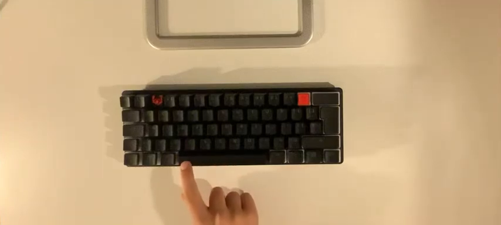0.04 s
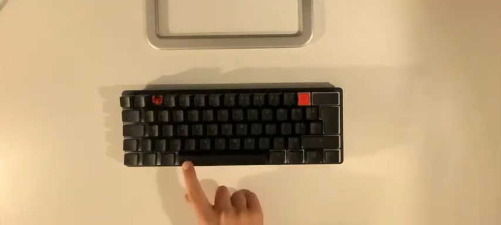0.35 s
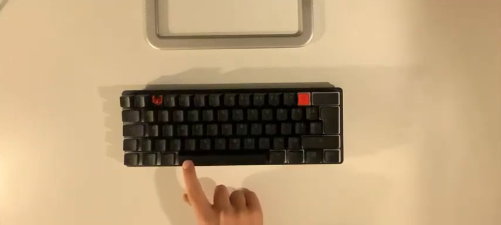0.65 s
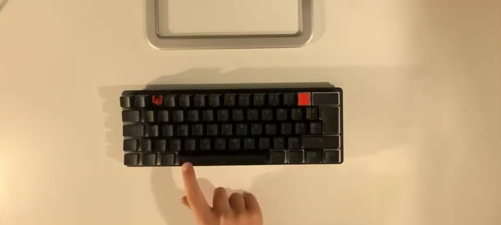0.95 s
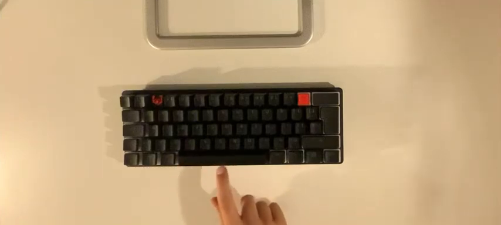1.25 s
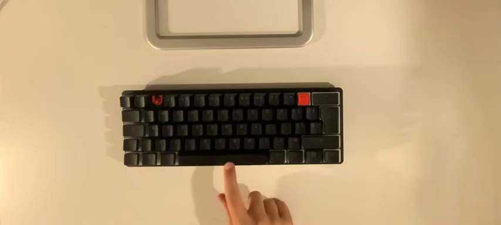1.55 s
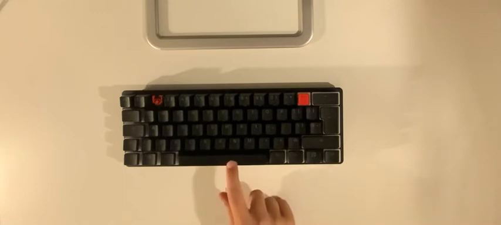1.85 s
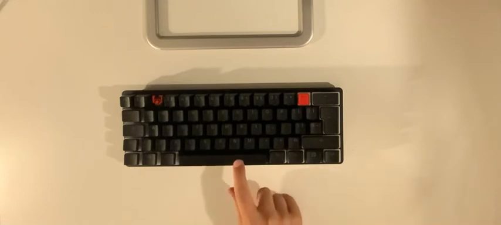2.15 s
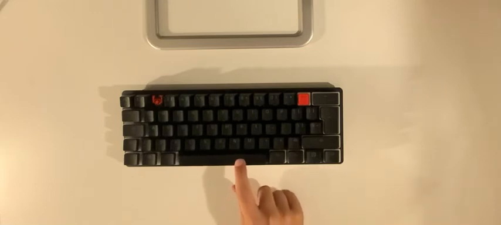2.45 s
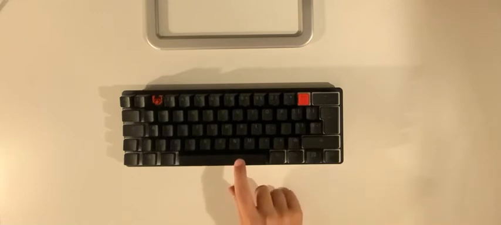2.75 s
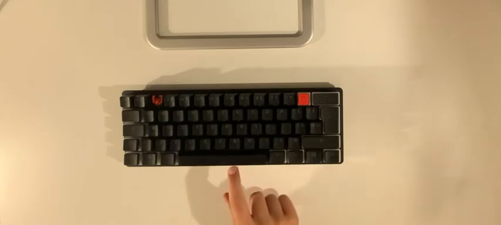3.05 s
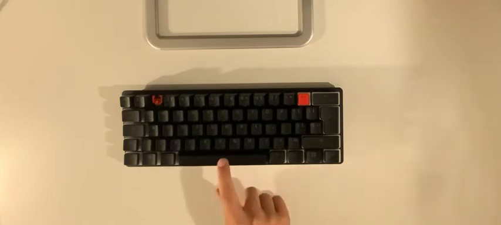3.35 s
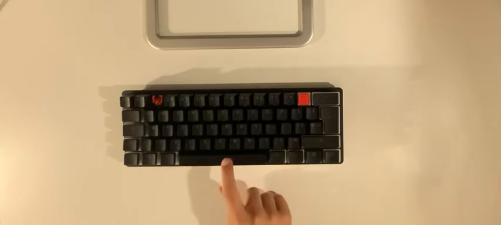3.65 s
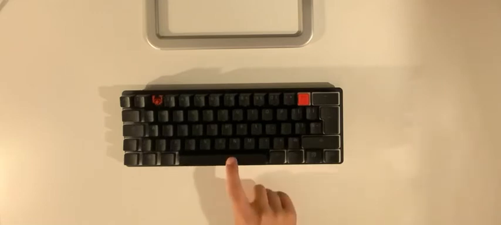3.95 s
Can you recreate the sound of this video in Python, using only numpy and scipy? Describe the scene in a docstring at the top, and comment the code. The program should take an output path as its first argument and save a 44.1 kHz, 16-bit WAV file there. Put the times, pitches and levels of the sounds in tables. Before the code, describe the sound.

Close up in a small room, one finger taps a mechanical keyboard's space bar rapidly, pauses briefly, and carries on, each press thocking and clicking. It ends with three loud, spaced slaps that rattle the loose bar.

```python
"""One finger works the space bar of a mechanical keyboard on a desk in a small room.
Quick, light runs come first. Each landing and return of the bar knocks the desk, whose dispersive
bending waves arrive treble first and end in a low thock. The stabiliser wire ticks, the stem rubs
in its switch, and the loose bar rattles when slapped. At 1.4 s a dull pop sounds on the left.
From 3.2 s three hard strikes close the scene, each dying away in the room."""
import sys
import numpy as np
from scipy import signal
from scipy.fft import rfft, irfft
from scipy.io import wavfile

SR = 44100
rng = np.random.default_rng(int(sys.argv[2]) if len(sys.argv) > 2 else 0)


def unload_wav(signal):
    """Save mono or channel-first audio to the path in sys.argv[1] as 16-bit WAV at rate SR, clipped to [-1, 1]."""
    wavfile.write(
        sys.argv[1],
        SR,
        np.round(np.clip(np.atleast_2d(signal).T, -1, 1) * 32767).astype(np.int16),
    )


N = 176400
SIZE, LEAD = 32768, 2048  # samples in one response, and ahead of its impact
HZ = np.maximum(np.arange(SIZE // 2 + 1) * SR / SIZE, 1)
AGE_S, TIME_S = np.arange(SIZE) / SR, np.arange(N) / SR

# Levels in all tables are relative; balance_db is left minus right.
# The bar springs back to its top stop: start_s, level_db, hardness_db
BAR_RETURNS = [(.001, -34.5, -1.5), (0.147, -29, -20), (.162, -34.5, -15.5), (.297, -33.5, -13.5),
               (0.313, -30.5, -32), (0.436, -25.5, -11.5), (0.458, -31, -17), (0.478, -27.5, -21),
               (0.564, -40.5, -25), (0.719, -36, -12.5), (0.736, -31.5, -24.5), (.881, -35, -15.5),
               (0.907, -39, -11.5), (1.345, -26, -15.5), (1.482, -39, -42), (1.511, -29.5, -10.5),
               (1.6562, -23.5, -2.5), (1.798, -36, -24), (1.821, -23.5, -15.5), (1.971, -35.5, -12),
               (1.994, -26, -14), (2.166, -29, -11.5), (2.335, -34, -13), (2.378, -41.5, -9),
               (2.48, -42, -16), (2.514, -36, -6.5), (2.655, -36.5, -4), (2.777, -28.5, -8.5),
               (2.913, -36.5, -29), (2.942, -35.5, -7), (3.320, -29, 0), (3.668, -28.5, -1),
               (3.991, -39.5, 24)]


def bar_knocks():
    """Impact excitation: the bar drives the desk as it lands and again as it springs back."""
    # Landings of the bar: start_s, level_db, hardness_db, hollow_db, pitch_hz
    landings = [(0.036, -29.5, -56, 16, 245), (0.057, -34, 0.5, 12, 228), (0.188, -26.5, -19.5, 11, 243.3),
                (0.207, -32.5, 1.5, 14, 237), (.338, -28, -20.5, 9, 258), (0.361, -37, -2, 18, 230),
                (.494, -25, -3, 10, 244), (0.767, -33, -17, 20, 243.5), (.781, -31, -0.5, 16, 249),
                (1.2698, -15.5, -6, 2.5, 237.6), (1.412, -24, -1.5, 2, 224), (1.576, -28.5, -6.5, 1.5, 217),
                (1.738, -30.5, 3, 8, 228), (1.896, -28.5, -2, -2, 241), (1.911, -23, -5.5, -1.5, 236),
                (2.052, -35, 0, -7, 252), (2.088, -29, 0, -1.5, 228), (2.248, -30, -6.5, 5, 238),
                (2.408, -22.5, -5.5, 5, 241), (2.564, -26, 0.5, 4.5, 232), (2.708, -27, -4, 1.5, 225.5),
                (2.823, -36, 10.5, 2.5, 242), (2.842, -26.5, -6.5, 7.5, 231), (3.2307, -29, 18.5, -5, 240),
                (3.234, -10.5, -1, -2, 235.2), (3.5612, -9, -1, 1.5, 242.8), (3.9098, -10.5, 3, 0.5, 243)]
    out = np.zeros((2, N))
    for start_s, level_db, hardness_db, hollow_db, pitch_hz in landings:
        thock = impact(desk_response(pitch_hz), level_db + 3, hardness_db, hollow_db, hard_hz=600)
        add(out, start_s - LEAD / SR, thock)
    desk = desk_response(pitch_hz=238)
    for start_s, level_db, hardness_db in BAR_RETURNS:
        thock = impact(desk, level_db + 2.5, hardness_db, hollow_db=6, hard_hz=435)
        add(out, start_s - LEAD / SR, thock)
    return out


def desk_response(pitch_hz):
    """Dispersion: a bending wave travels faster in the treble, echoes off the edge and rings modes."""
    # Spectrum of the bending wave at reference_hz: frequency_hz, level_db
    wave_spectrum = [(20, -70), (60, -38), (95, -33), (140, -20), (205, -0.5), (245, -2.5), (315, -2),
                     (385, -23.5), (490, -23), (650, -24), (1000, -22.5), (1550, -24), (1850, -36.5),
                     (3500, -49.5), (7000, -63.5), (14000, -100)]
    # Direction of the desk's sound: frequency_hz, balance_db
    balance = [(100, -6), (220, -7), (330, -11), (600, -9), (1100, 0), (2500, -20.5)]
    # Normal modes of desk and case: pitch_hz, level_db, t60_s
    modes = [(125, -25.5, 0.5), (236, -10, .16), (311.3, -19.5, 0.12), (390.1, -11.5, 0.14),
             (490, -22.5, 0.1), (781, -21.5, 0.06), (1577, -20, 0.026)]
    reference_hz, stiff_hz = 240.64, 1993  # travel time goes as 1 / sqrt(frequency) up to stiff_hz
    echo_s, echo_db, echo_cut_hz = 0.008327, [5.5, -39], 390  # echo_db: left, right
    delay_s = 0.014 * np.maximum(np.sqrt(reference_hz / HZ) - np.sqrt(reference_hz / stiff_hz), 0)
    travel = np.exp(-2j * np.pi * (np.cumsum(delay_s) * SR / SIZE + HZ * LEAD / SR))
    echo = from_db(echo_db)[:, None] * np.exp(-2j * np.pi * HZ * echo_s) * lowpass(echo_cut_hz)
    ringing = sum(from_db(level_db) / (1 + 1j * (HZ / hz - hz / HZ) * np.pi * hz * t60_s / np.log(1000))
                  for hz, level_db, t60_s in modes)
    wave = minimum_phase(at_hz(wave_spectrum, HZ * reference_hz / pitch_hz))
    response = travel * panned(at_hz(balance, HZ)) * (wave * (1 + echo) + ringing)
    return response / np.abs(irfft(response)).max()


def impact(desk, level_db, hardness_db, hollow_db, hard_hz):
    """Source and filter: the contact force drives the desk, and a harder contact has more treble."""
    cavity_hz, boom_hz, ripple_db = 480, 120.5, 4
    treble = 0.5 + 0.5 * np.tanh(2 * np.log(HZ / hard_hz))
    cavity = np.exp(-(np.log2(HZ / cavity_hz) / 0.66) ** 2)  # the hollow under the bar
    # Hollow strokes also stir the desk's lowest mode.
    boom_db = (1.3 * hollow_db - 8.5) * np.exp(-(np.log2(HZ / boom_hz) / 0.3) ** 2)
    force = from_db(level_db + hardness_db * treble + hollow_db * cavity + boom_db)
    # Where the finger lands changes which desk waves are stirred.
    knots_hz = np.geomspace(200, 3000, 16)
    ripple = np.interp(HZ, knots_hz, rng.standard_normal(len(knots_hz)) * (knots_hz > 230))
    cushion = lowpass(4500)  # the keyboard's feet keep the top out of the desk
    return irfft(desk * chatter() * cushion * minimum_phase(ripple_db * ripple) * force)


def chatter(touches=12, spread_s=0.0105, crossover_hz=493):
    """Interference: one contact is a single push in the bass and scattered small touches higher up."""
    touch_s = rng.uniform(-0.3918, 0.5095, touches) * spread_s
    scatter = rng.standard_normal(touches) @ np.exp(-2j * np.pi * touch_s[:, None] * HZ)
    scatter /= np.sqrt(np.mean(np.abs(scatter[(HZ > 600) & (HZ < 1800)]) ** 2))
    share = 1 / (1 + (crossover_hz / HZ) ** 4) ** 2
    return np.sqrt(1 - share) + np.sqrt(share) * scatter


def case_knocks(swell_s=0.0043):
    """Damped resonance: a firm landing makes the hollow plastic case sound for a few cycles."""
    # Knocks of the case: start_s, level_db, pitch_hz
    knocks = [(0.4985, -36.5, 567), (0.788, -35.5, 418), (1.273, -30, 481), (2.414, -33, 485),
              (2.843, -37.5, 407)]
    out = np.zeros((2, N))
    swell = (AGE_S / swell_s * np.exp(1 - AGE_S / swell_s)) ** 2
    for start_s, level_db, pitch_hz in knocks:
        tone = swell * np.sin(2 * np.pi * pitch_hz * AGE_S)
        add(out, start_s, from_db(level_db) * panned(-1.5) * tone)
    return out


def wire_ticks():
    """Impact ringing: the stabiliser wire taps its clips and rings under a bright plastic snap."""
    # Taps of the wire: start_s, ring_db, snap_db, ring_balance_db
    taps = [(0.0567, -37, -59.5, 8), (0.198, -52, -56.5, 1), (0.2065, -37, -64, 1), (0.3578, -41, -73, 7),
            (0.4655, -49, -58.5, 3), (0.4952, -33.5, -51.5, -4), (0.7558, -46.5, -55, 12),
            (0.766, -48, -58, 9), (0.7852, -36, -60, 2), (0.9063, -52.5, -73, 1), (1.269, -31.5, -49, 20),
            (1.3138, -43.5, -63, -4), (1.411, -39.5, -47.5, 21), (1.514, -57, -69, 7),
            (1.5266, -48.5, -61, -1), (1.5746, -41, -66, 7), (1.658, -49.5, -57, 12), (1.71, -42, -49.5, 1),
            (1.738, -35.5, -59, 2), (1.8936, -42, -43.5, 5), (1.914, -38.5, -56, 5), (2.051, -41.5, -48, 9),
            (2.0853, -41, -61, 15), (2.245, -44, -65, 1), (2.3744, -51, -64, 3), (2.4081, -36, -46, 4),
            (2.5257, -51.5, -59, 3), (2.5638, -32, -55.5, 5), (2.648, -53, -76, 15), (2.668, -47, -56, -6),
            (2.707, -40, -81, 15), (2.78, -41.5, -53, 5), (2.819, -42, -43.5, 17), (2.839, -34.5, -59, 3),
            (3.2341, -24.5, -33, 32), (3.291, -52, -56, 3), (3.3205, -45, -49, -1),
            (3.5615, -21.5, -33.5, 7), (3.6335, -39, -43.5, 5), (3.664, -54, -60, 16),
            (3.9091, -20.5, -30, 8), (3.959, -55, -51.5, -20), (3.9944, -34, -64, 15)]
    # Spectrum of the wire's ring: frequency_hz, level_db
    ring_spectrum = [(200, -40), (1000, -20), (2000, -15), (3300, -17), (3950, -6), (4400, -1), (4750, 0),
                     (5150, -3), (5700, -15), (9000, -30), (16000, -55)]
    # Spectrum of the plastic snap: frequency_hz, level_db
    snap_spectrum = [(200, -44), (3000, -12.5), (5800, -7.5), (8200, 0), (10000, -7), (12000, -19),
                     (16000, -29.5)]
    ring_response, snap_response = impulse_response(ring_spectrum), impulse_response(snap_spectrum)
    out = np.zeros((2, N))
    for start_s, ring_db, snap_db, balance_db in taps:
        ring = from_db(ring_db - 29) * burst(ring_response, fall_s=0.0015, correlation=0.12)
        snap = from_db(snap_db - 22.5) * burst(snap_response, fall_s=0.0022, correlation=0.34)
        add(out, start_s, np.sqrt(SR) * (panned(balance_db) * ring + snap))
    return out


def bar_rattles():
    """Repeated collision: the loose bar makes a dense run of uneven contacts when slapped."""
    # Runs of contacts: start_s, length_s, level_db
    runs = [(1.259, 0.0035, -44.5), (1.409, 0.0042, -42), (1.896, 0.0066, -46.5), (2.817, 0.0037, -41.5),
            (3.2271, 0.011, -33), (3.555, 0.012, -31.5), (3.9019, 0.0045, -28.5), (3.990, 0.0087, -49)]
    # Spectrum of the rattle: frequency_hz, level_db
    spectrum = [(40, -39), (250, -16), (700, -4.5), (1150, 8), (1600, 10), (2100, -9), (3300, 3.5),
                (4700, 8), (6000, -2), (9500, 2), (12000, -4.5), (16000, -29.5)]
    # Direction of the rattle: frequency_hz, balance_db
    balance = [(1000, -5.5), (2500, -9.5), (4600, -15), (6500, 3)]
    envelope, fall_s = np.zeros(N), 0.0068
    for start_s, length_s, level_db in runs:
        decay = np.exp(-np.maximum(TIME_S - start_s - length_s, 0) / fall_s)
        envelope += from_db(level_db) * (TIME_S >= start_s) * decay
    rattle = coloured(envelope * grains(correlation=0.19), spectrum)
    return irfft(rfft(rattle) * panned(at_hz(balance, np.fft.rfftfreq(N, 1 / SR) + 1)))


def stem_rubbing():
    """Sliding friction: the stem rubs in its housing as the bar rises or shifts."""
    # The bar shifts under the resting finger: centre_s, level_db
    shifts = [(0.591, -64), (0.657, -65), (1.495, -63.5), (1.262, -67.5), (1.812, -65), (2.235, -62),
              (2.546, -63)]
    # Spectrum of the friction: frequency_hz, level_db
    spectrum = [(40, -35), (300, -10), (1200, -2), (2300, -11), (3600, -6), (4500, 4), (5100, 1),
                (5900, -10), (9500, -12), (12000, -26), (16000, -40)]
    lead_s, rise_width_s, shift_width_s = 0.0021, 0.012, 0.0087
    power = np.zeros(N)
    for start_s, _, hardness_db in BAR_RETURNS:
        if hardness_db < 1:  # brisker returns rub louder; the very hardest has no rub
            swell = np.exp(-((TIME_S - start_s + lead_s) / rise_width_s) ** 2)
            power += from_db(0.6 * hardness_db - 57.5) ** 2 * swell
    for centre_s, level_db in shifts:
        power += from_db(level_db) ** 2 * np.exp(-((TIME_S - centre_s) / shift_width_s) ** 2)
    return coloured(np.sqrt(power) * grains(correlation=0.64), spectrum)


def pop(start_s=1.4232, level_db=-18, fall_s=0.0014):
    """A short, dull pop on the left only: an abrupt step that dies away quickly."""
    out = np.zeros((2, N))
    add(out, start_s, from_db(level_db) * np.exp(-AGE_S / fall_s) * np.array([[1], [0]]))
    return out


def room(sound, onset_s=0.00067):
    """Reverberation: a diffuse tail in which each band decays at its own rate."""
    # Spectrum of the tail: frequency_hz, level_db
    spectrum = [(25, -35.5), (60, -0.5), (130, 1.5), (240, -12.5), (500, -8), (1200, -8.5), (2500, -6),
                (4700, -8.5), (9500, -7.5), (12000, -14), (16000, -37)]
    # Reverberation times: frequency_hz, t60_s
    decay_times = [(100, 0.12), (300, 0.31), (1000, 0.26), (4500, 0.21), (10000, 0.15), (16000, .14)]
    centres_hz = np.geomspace(60, 16000, 12)
    white, tail = rfft(stereo_noise(correlation=0.6, size=SIZE)), 0
    for hz, share in zip(centres_hz, np.eye(len(centres_hz))):
        band = irfft(white * np.interp(np.log(HZ), np.log(centres_hz), share))
        envelope = from_db(-60 * AGE_S / at_hz(decay_times, hz)) * (1 - np.exp(-(AGE_S / onset_s) ** 2))
        tail = tail + band * envelope / np.linalg.norm(envelope)
    tail = irfft(rfft(tail) * minimum_phase(at_hz(spectrum, HZ)))
    return signal.fftconvolve(sound, tail, axes=1)[:, :N]


def background(level_db=-71.5):
    """Stationary noise: a faint, low rumble, the same on both sides."""
    # Spectrum of the background: frequency_hz, level_db
    spectrum = [(20, -26), (60, 2.5), (125, 3), (200, -21), (500, -23.5), (1100, -15.5), (2000, -28.5),
                (5000, -32), (10000, -33.5), (13000, -49.5), (16000, -65.5)]
    return from_db(level_db) * coloured(stereo_noise(correlation=1, size=N), spectrum)


def burst(response, fall_s, correlation, rise_s=0.0012, size=2048):
    """Transient excitation: a filtered puff of noise with unit energy on each side."""
    envelope = np.exp(-AGE_S[:size] / fall_s) * (1 - np.exp(-AGE_S[:size] / rise_s))
    sound = signal.fftconvolve(stereo_noise(correlation, size) * envelope, response[None, :size], axes=1)
    return sound / np.linalg.norm(sound, axis=1, keepdims=True)


def grains(correlation, depth_db=4):
    """Random amplitude modulation: noise broken into grains under a millisecond long."""
    noise = stereo_noise(correlation, N)
    knots = np.arange(0, N, 32)
    noise *= from_db(depth_db * np.interp(np.arange(N), knots, rng.standard_normal(len(knots))))
    return noise / noise.std()


def stereo_noise(correlation, size):
    """Partial coherence: white noise shared in part by both sides."""
    mid, side = rng.standard_normal((2, size))
    mid, side = np.sqrt(1 + correlation) * mid, np.sqrt(1 - correlation) * side
    return np.array([mid + side, mid - side]) / np.sqrt(2)


def coloured(sound, spectrum):
    """Convolution that imposes a spectrum and keeps the power of white noise."""
    response = impulse_response(spectrum)
    return signal.fftconvolve(sound, response[None] / np.linalg.norm(response), axes=1)[:, :N]


def impulse_response(spectrum):
    """Causal impulse response with a tabulated spectrum."""
    return irfft(minimum_phase(at_hz(spectrum, HZ)))


def minimum_phase(level_db):
    """Minimum-phase frequency response, by folding the cepstrum onto positive time."""
    cepstrum = irfft(np.log(from_db(level_db)))
    cepstrum[1:SIZE // 2] *= 2
    cepstrum[SIZE // 2 + 1:] = 0
    return np.exp(rfft(cepstrum))


def lowpass(corner_hz):
    """Fourth-order roll-off: 24 dB an octave above the corner."""
    return 1 / (1 + (HZ / corner_hz) ** 4)


def panned(balance_db):
    """Constant-power law: left and right gains for a level difference."""
    gains = np.vstack([from_db(balance_db / 2), from_db(-balance_db / 2)])
    return gains / np.sqrt(np.mean(gains ** 2, axis=0))


def at_hz(table, hz):
    """Interpolation on a log-frequency axis."""
    frequency_hz, values = np.array(table).T
    return np.interp(np.log(hz), np.log(frequency_hz), values)


def from_db(db):
    """Decibels to amplitude ratio."""
    return 10 ** (np.asarray(db) / 20)


def add(out, start_s, sound):
    """Superposition: mix a stereo sound in at a time."""
    start = int(round(start_s * SR))
    first, last = max(start, 0), min(start + sound.shape[1], N)
    out[:, first:last] += sound[:, first - start:last - start]


def scene():
    """Superposition of the keyboard's direct sound, its reverberation, the pop and the background."""
    keyboard = bar_knocks() + case_knocks() + wire_ticks() + bar_rattles() + stem_rubbing()
    rumble = background()
    return keyboard + room(keyboard) + pop() + rumble


def record(dry):
    """Mid-side filtering: the very top is dull in the middle, wide at the sides and cut at 16 kHz."""
    # Response of the middle: frequency_hz, gain_db
    mid_spectrum = [(20, 0), (10000, -1.5), (13000, -4), (16000, -13)]
    # Response of the sides: frequency_hz, gain_db
    side_spectrum = [(9500, -1.5), (12500, 12.5)]
    left, right = dry
    mid = signal.fftconvolve((left + 0.91 * right) / 2, impulse_response(mid_spectrum))[:N]
    side = signal.fftconvolve((left - 1.015 * right) / 2, impulse_response(side_spectrum))[:N]
    steep_cut = signal.ellip(10, 0.2, 80, 16000, fs=SR, output="sos")
    return signal.sosfilt(steep_cut, np.array([mid + side, mid - side]))


dry = scene()
out = record(dry)
unload_wav(out)
```